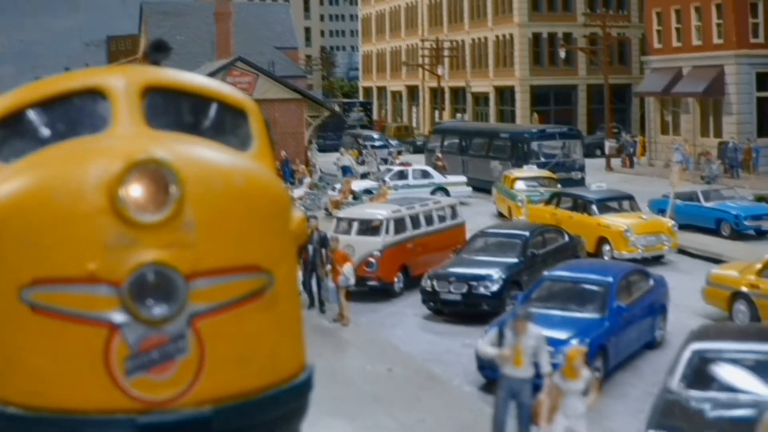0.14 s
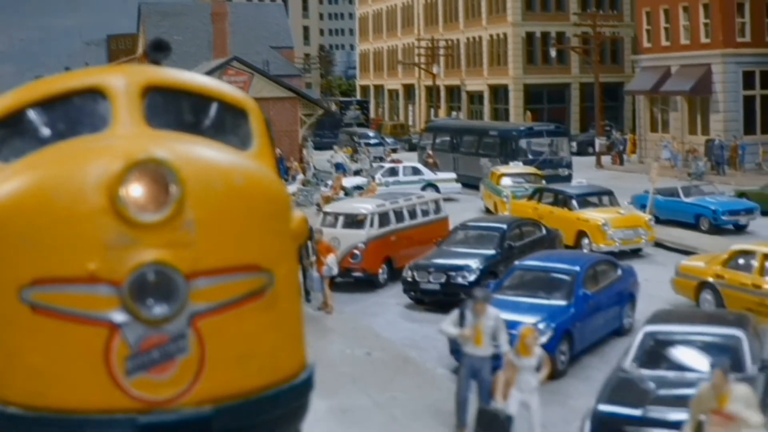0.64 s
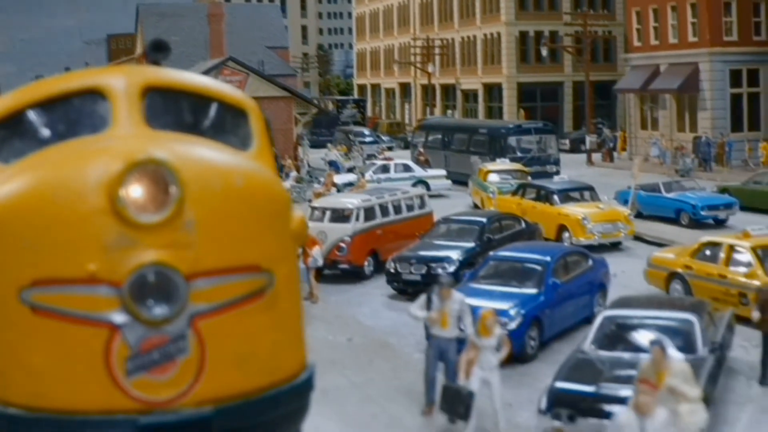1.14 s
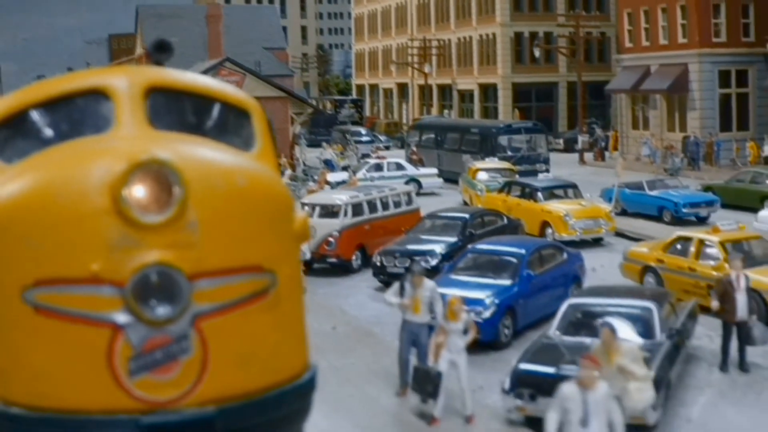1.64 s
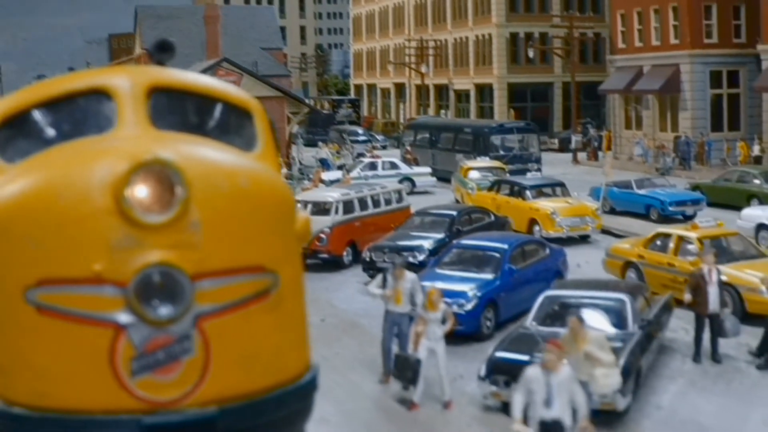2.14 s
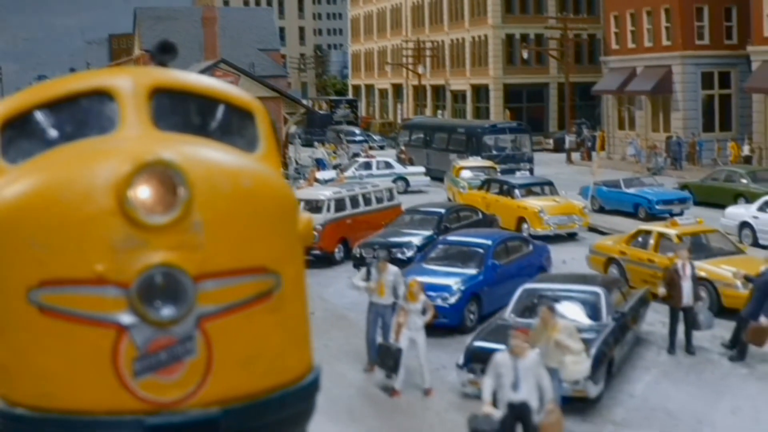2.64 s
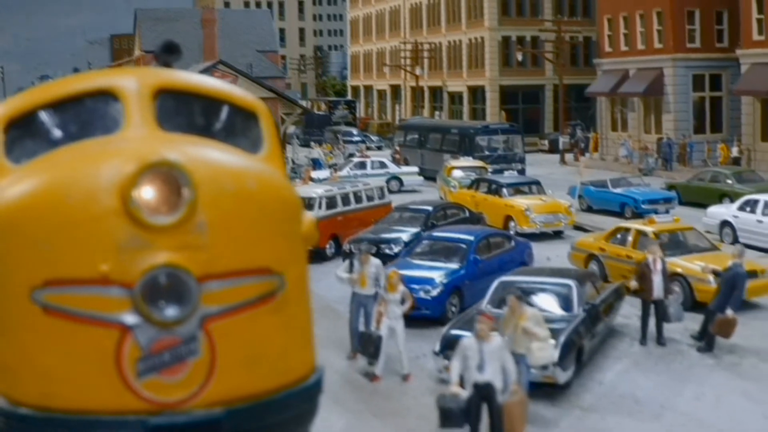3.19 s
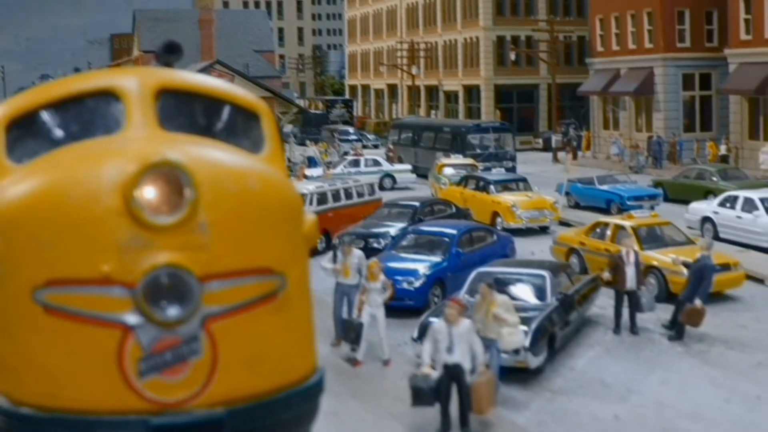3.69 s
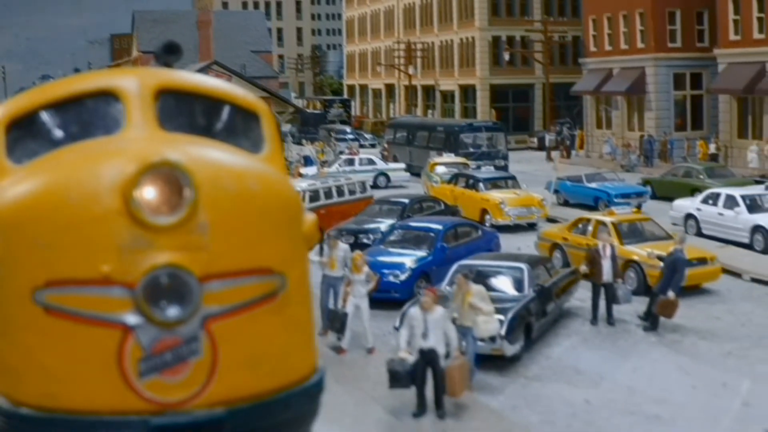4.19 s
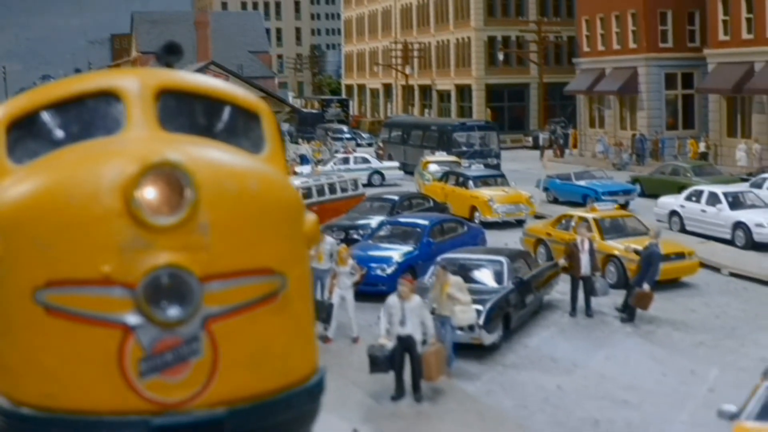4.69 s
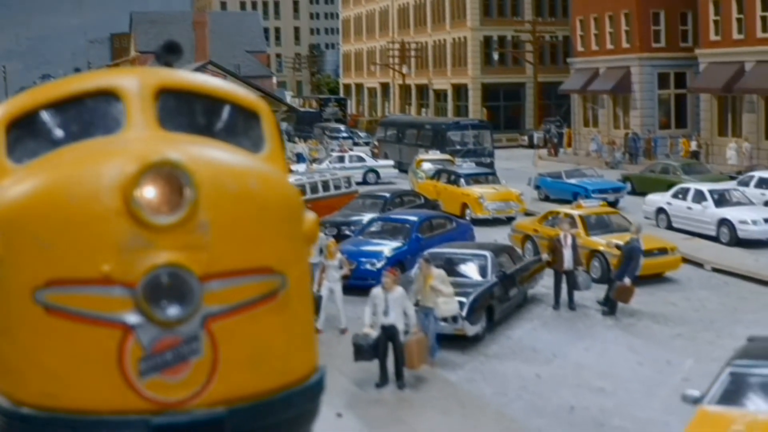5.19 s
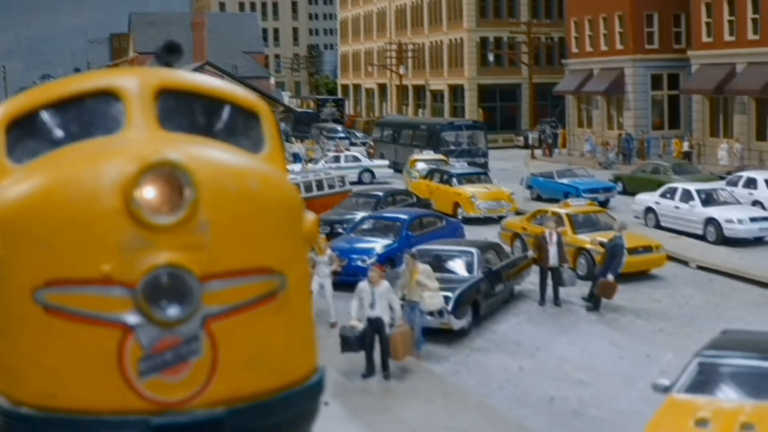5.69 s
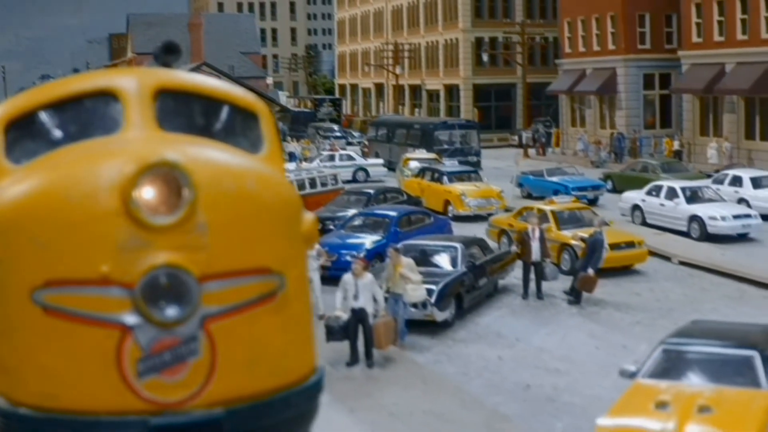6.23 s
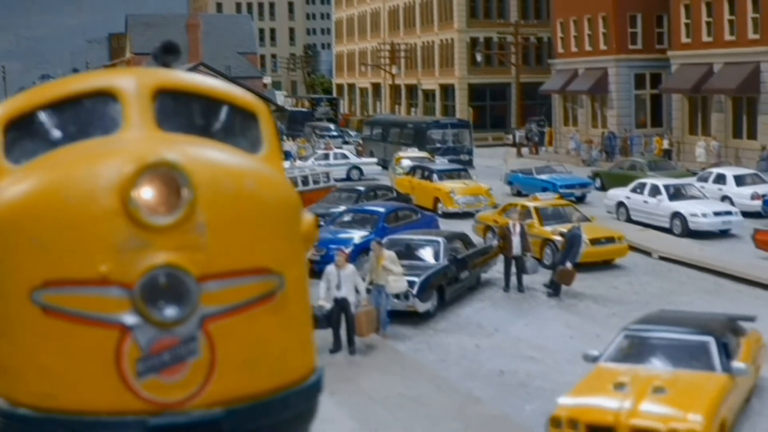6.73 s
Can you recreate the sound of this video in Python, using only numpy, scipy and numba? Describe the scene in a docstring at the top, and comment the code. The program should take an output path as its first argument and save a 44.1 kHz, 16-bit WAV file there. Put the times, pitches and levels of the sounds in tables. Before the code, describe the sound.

A small electric model train rolls at steady speed on a hollow baseboard, with the stereo microphone very near. From start to finish there is a clean, very deep hum around 57 hertz, a fainter one above it, and a dark, slightly fluttering rumble; the treble is only a faint hiss. The bass leans to the right. Wheels cross rail joints irregularly: a woody knock with a tiny ping at 0.3 seconds, a duller one at 1.2, light knocks and clicks near 3.0 and 3.2, then the hardest, a hollow thump with a bright dry tick, at 3.4, after which the rumble is briefly ducked. A blunt knock follows at 4.5, a faint click at 4.7, softer knocks at 6.2 and 6.5, and a heavy deep thump at 6.8. Several random soft taps fall between. No echo, and the train never stops.

```python
"""First come two clean hums in a low rumble: a small electric train at steady speed on a hollow baseboard.
The two-port microphone rides close to it; its ports hear the middle range in opposite phase.
Hums are sines, the rumble is shaped noise, and knocks and clicks over rail joints are mostly dying modes.
A peak limiter ducks everything after hard knocks, and a compressor evens the bass."""
import sys
import numpy as np
from scipy import signal
from scipy.fft import rfft, irfft, next_fast_len
from scipy.io import wavfile
from scipy.ndimage import uniform_filter1d, minimum_filter1d
from numba import njit

SR = 44100
rng = np.random.default_rng(int(sys.argv[2]) if len(sys.argv) > 2 else 0)


def volts(x):
    """Linear amplitude factor 10**(x/20) for a level x in dB, scalar or array-like."""
    e = np.asarray(x, float) / 20
    return 10 ** e


def to_wav(sig):
    """Store sig (one row per channel, or 1-D mono) as 16-bit WAV at the path in sys.argv[1].

    Samples outside -1..1 are clipped; the rate is SR.
    """
    pcm = np.clip(np.atleast_2d(sig), -1, 1) * 32767
    pcm = np.round(pcm).astype(np.int16)
    wavfile.write(sys.argv[1], SR, pcm.T)  # frames by channels


N = 301644  # samples


def read(table, hz):
    """Columns of a table over frequency, joined on a log axis."""
    f, *columns = np.transpose(table)
    return [np.interp(np.log(hz + 1), np.log(f + 1), column) for column in columns]


def smooth_chance(shape, spans):
    """Gaussian chance smoothed along each axis, rms 1."""
    z = rng.standard_normal(shape)
    for axis, span in enumerate(spans):
        z = uniform_filter1d(z, round(span), axis=axis, mode="wrap")
    return z / z.std()


def add(mix, start_s, sound):
    """Mixes a sound in at a time, cut off at the end of the mix."""
    part = mix[..., round(start_s * SR):][..., :sound.shape[-1]]
    part += sound[..., :part.shape[-1]]


def ring(modes, rise_s):
    """Dying sines with a soft start, one row a mode, as turning phasors; their sum peaks at 1."""
    t = np.arange(SR // 5) / SR
    hz, db, t60 = np.transpose(modes)[:3, :, None]
    fade = volts(db - 60 * t / t60)
    onset = (1 - np.exp(-t / rise_s)) ** 3
    tones = fade * np.exp(2j * np.pi * hz * t) * onset
    return tones / abs(tones.sum(0).imag).max()


def at_ports(modes, rise_s):
    """Modes that reach each port by their own path: the left gets its own level and lag for each."""
    tones = ring(modes, rise_s)
    left_db, left_lag = np.transpose(modes)[3:, :, None]
    left = (tones * volts(left_db) * np.exp(-1j * left_lag)).sum(0)
    return np.array([left, tones.sum(0)]).imag


# rolling noise at the right port, before the board lifts it: (f/Hz, level/dB per Hz)
ROLLING_NOISE = [(15, -49.5), (36, -51.5), (46, -42.5), (62, -41), (100, -51), (150, -52), (230, -56),
                 (420, -64), (650, -63), (800, -69), (1200, -87.5), (2200, -99.5), (3000, -104),
                 (4400, -110), (10500, -112), (12700, -121), (13100, -131), (16000, -140)]
# resonances of baseboard and housing that shape the rumble: (f/Hz, width/Hz, level/dB)
BOARD_RESONANCES = [(89.3, 25, 6.5), (183.5, 34.3, 8.5), (278, 10, 2.5), (316, 19, 3), (359.6, 15, 8),
                    (433.6, 28, 5), (603, 13, -3.5), (1060, 68, 3), (2830, 260, -1.5), (3720, 790, 0),
                    (6500, 3800, 3)]


def rumble(patchy_db, flicker_db, swell_db):
    """Rolling noise through the board, in two draws: one for both ports, one for the left alone."""
    hz = np.fft.rfftfreq(N, 1 / SR)
    level_db = read(ROLLING_NOISE, hz)[0]
    for f, width, db in BOARD_RESONANCES:
        level_db = level_db + db / (1 + (2 * (hz - f) / width) ** 2)
    white = rng.standard_normal((2, N)) * np.sqrt(SR / 2)  # 0 dB per Hz
    z = signal.stft(white, nperseg=512, noverlap=384)[2]
    # uneven wheels and track: patches in time and pitch, a flicker and a slow swell common to all bands
    patches = patchy_db * smooth_chance(z.shape[1:], (8, 20))
    flicker = flicker_db * smooth_chance(z.shape[2:], (10,))
    swell = swell_db * smooth_chance(z.shape[2:], (170,))
    z *= volts(patches + flicker + swell)
    uneven = signal.istft(z, nperseg=512, noverlap=384)[1][:, :N]
    return irfft(rfft(uneven) * volts(level_db), N)


# steady hums as they reach the right port: (f/Hz, rms level/dB)
STEADY_HUMS = [(57.09, -20.5), (136.52, -32.5)]


def hums():
    """Rotating parts at constant speed: clean sines."""
    t = np.arange(N) / SR
    out = np.zeros(N)
    for hz, rms_db in STEADY_HUMS:
        out += np.sqrt(2) * volts(rms_db) * np.sin(2 * np.pi * (hz * t + rng.random()))
    return out


# the microphone's left port against its right: (f/Hz, level/dB, likeness 0-1, lag/rad)
LEFT_PORT = [(35, -7, .65, .5), (58, -8, .98, .5), (110, -8.8, .94, .58), (150, -12, .68, .68),
             (200, -16, .72, .65), (250, -15.5, .35, 1.7), (300, -16, .65, 3.25), (400, -13, .95, 3.48),
             (600, -5.4, .99, 3.48), (1000, -1.7, .96, 3.55), (1900, 1.5, .55, 3.45), (2620, 1, .45, 2.3),
             (2740, .1, .5, -.5), (3800, .1, .55, -.6), (5400, -2, .17, 3.2), (7000, -1.5, .05, 3.1)]


def hear_at_ports(direct, shared, own):
    """The left port is a coloured, phase-turned copy of the right, partly replaced by its own rumble."""
    level_db, like, lag = read(LEFT_PORT, np.fft.rfftfreq(N, 1 / SR))
    # the two rumbles are mixed at constant power
    heard = rfft(direct) + like * rfft(shared) + np.sqrt(1 - like ** 2) * rfft(own)
    left = irfft(heard * volts(level_db) * np.exp(-1j * lag), N)
    return np.array([left, direct + shared])


# modes of the wheel's tick: (f/Hz, relative level/dB, t60/s, left port level/dB, left lag/rad)
TICK_MODES = [(1340, -4, 0.0098, 4, 4.5), (1780, 4, 0.011, -3.5, 3.5), (2220, -6, 0.0063, -3, -0.5),
              (2620, -2, 0.015, 2, 4), (3160, -2, 0.0084, 6, -0.5), (3610, 2, .009, -1.5, 0.5),
              (4520, -2, 0.01, -11, 0.5), (5560, 6, 0.0083, -10, -5), (6440, -10.5, 0.0099, 3, 2.5),
              (7480, -5, 0.008, -16.5, 1)]
# modes of the rail's ping: (f/Hz, relative level/dB, t60/s, left port level/dB, left lag/rad)
PING_MODES = [(1700, 4, .012, .5, 3.3), (2730, -3, .024, .5, 1.6), (4700, -4, .007, -6, .3),
              (5300, 1, .009, -12, 1.5)]
# dry wheel clicks at the right port:
# (t/s, tick peak level/dB, level/dB of the snap's noise before its filter, ping peak level/dB)
WHEEL_CLICKS = [(0.337, -51.5, -53.5, -42.5), (2.979, -53, -45.5, -71), (3.233, -49, -75, -61),
                (3.3737, -25, -44.5, -48), (3.38, -52, -33.5, -63), (4.74, -52, -48, -68),
                (6.216, -48, -51, -48), (6.832, -48, -54, -55)]


def wheel_clicks():
    """Each click is a tick of wheel modes, a snap of band-passed noise and a ping of the rail."""
    out = np.zeros((2, N))
    tick, ping = at_ports(TICK_MODES, rise_s=0.00056), at_ports(PING_MODES, rise_s=0.00086)
    snap_rise_s, snap_fade_s, snap_left_db = 0.00018, 0.001, -8
    t = np.arange(SR // 100) / SR
    shape = (1 - np.exp(-t / snap_rise_s)) * np.exp(-t / snap_fade_s)
    band = signal.butter(3, [3600, 8550], "band", fs=SR, output="sos")
    for s, tick_db, snap_db, ping_db in WHEEL_CLICKS:
        snap = signal.sosfilt(band, rng.standard_normal((2, len(t))) * shape)
        add(out, s, snap * volts([[snap_db + snap_left_db], [snap_db]]))
        add(out, s, volts(tick_db) * tick + volts(ping_db) * ping)
    return out


# dull knocks of the car floor, a few cycles without ring: (t/s, f/Hz, peak level/dB, length/s)
FLOOR_KNOCKS = [(1.2345, 720, -16.5, .0075), (3.3725, 625, -10, .0085), (3.3735, 205, -6, .0115),
                (4.526, 318, -13, .016), (6.8275, 570, -12.5, .009)]


def floor_knocks():
    """Some blows also bump the car floor: a short sine swells and dies within a few cycles."""
    out = np.zeros(N)
    for s, hz, db, length_s in FLOOR_KNOCKS:
        t = np.arange(0, length_s, 1 / SR)
        swell = np.sin(np.pi * t / length_s) ** 2
        add(out, s, volts(db) * swell * np.sin(2 * np.pi * hz * t))
    return out


# wheels over rail joints, peaks at the right port:
# (t/s, thump level/dB, tap level/dB, ring level/dB, clack level/dB)
JOINT_KNOCKS = [(.3385, -20, -19.5, -29, -31), (1.2346, -23.5, -27.5, -36, -30.5),
                (2.9907, -21, -28, -36, -44), (3.2308, -26.5, -19, -37.5, -48.5),
                (3.3735, -9.5, -11.5, -18, -29), (4.5275, -22, -21, -32.5, -36.5),
                (6.217, -28, -28.5, -34, -32.5), (6.5182, -23.5, -26, -44, -39),
                (6.831, -5.5, -25, -26.5, -27)]
# middle level of a soft knock: (thump level/dB, tap level/dB, ring level/dB, clack level/dB)
SOFT_KNOCK = [-30.5, -22, -34.5, -45.5]


def all_knocks():
    """Knocks of the rail joints, and six soft ones where small unevenness of the track comes at random."""
    when, size = rng.random((6, 2)).T
    soft = np.array(SOFT_KNOCK) + 4 * (2 * size[:, None] - 1)  # up to 4 dB softer or harder
    return JOINT_KNOCKS + [(s, *levels) for s, levels in zip(when * N / SR, soft)]


# mode of the board's tap: (f/Hz, relative level/dB, t60/s)
TAP_MODES = [(309, 0, 0.025)]
# mode of the car body's ring: (f/Hz, relative level/dB, t60/s)
BODY_MODES = [(613, 0, 0.066)]


def taps_and_body(knocks):
    """Each blow strikes board and car body in its own proportion, in opposite directions."""
    out = np.zeros(N)
    tap = ring(TAP_MODES, rise_s=0.0032).sum(0).imag
    body = ring(BODY_MODES, rise_s=0.0072).sum(0).imag
    for s, _, tap_db, ring_db, _ in knocks:
        add(out, s, volts(ring_db) * body - volts(tap_db) * tap)
    return out


# modes of the board's thump: (f/Hz, relative level/dB, t60/s, left port level/dB, left lag/rad)
THUMP_MODES = [(124.6, 4, 0.1, 4, 1.3), (185.4, 14, 0.062, -13, 3.6), (222, -6.5, 0.019, -1, 4.1)]
# mode of the wheel frame's clack: (f/Hz, relative level/dB, t60/s, left port level/dB, left lag/rad)
CLACK_MODES = [(1020, 0, .028, -2.5, 2.8)]


def thumps_and_clacks(knocks):
    """Each blow thumps the board and clacks the wheel frame, with its own path to each port."""
    out = np.zeros((2, N))
    thump, clack = at_ports(THUMP_MODES, rise_s=0.0028), at_ports(CLACK_MODES, rise_s=0.0018)
    for s, thump_db, _, _, clack_db in knocks:
        add(out, s, volts(thump_db) * thump + volts(clack_db) * clack)
    return out


def scene():
    """Rumble, hums, taps and floor knocks share one path to the ports; thumps and clicks have their own."""
    shared, own = rumble(patchy_db=0.65, flicker_db=0.65, swell_db=0.3)
    knocks = all_knocks()
    direct = hums() + taps_and_body(knocks) + floor_knocks()
    return hear_at_ports(direct, shared, own) + wheel_clicks() + thumps_and_clacks(knocks)


@njit
def duck(over_db, quick, slow, charge):
    """A quick stage catches each peak and charges a slow stage that lingers."""
    out, quick_db, slow_db = np.zeros(len(over_db)), 0., 0.
    for i in range(len(over_db)):
        quick_db = max(over_db[i] - slow_db, quick_db * quick)
        slow_db = slow_db * slow + charge * quick_db
        out[i] = quick_db + slow_db
    return out


def limit(x, ceiling_db, quick_s, slow_s, charge_per_s, window):
    """Peak limiter on the louder port, looking half a window (in samples) ahead."""
    peak_db = 20 * np.log10(abs(x).max(0) + 1e-9)
    over_db = -minimum_filter1d(ceiling_db - peak_db, size=window)
    quick, slow = np.exp(-1 / (quick_s * SR)), np.exp(-1 / (slow_s * SR))
    cut_db = duck(over_db, quick, slow, charge_per_s / SR)
    return x / volts(uniform_filter1d(cut_db, size=window))


def even_bass(x, top_hz, knee_db, share, span_s):
    """Bass compressor: swells of the right port's low band above the knee turn both low bands down."""
    low = signal.sosfiltfilt(signal.butter(2, top_hz, fs=SR, output="sos"), x)
    envelope = abs(signal.hilbert(low[1], next_fast_len(N))[:N])
    swell = uniform_filter1d(envelope, round(span_s * SR))
    over_db = np.clip(20 * np.log10(swell + 1e-9) - knee_db, 0, 4)
    return x - low * (1 - 1 / volts(share * over_db))


def low_pass(x):
    """Removes everything above the highest recorded frequency."""
    return signal.sosfilt(signal.butter(12, 15670, fs=SR, output="sos"), x)


def record(dry):
    """The limiter ducks both ports together, then the compressor evens the bass."""
    limited = limit(dry, ceiling_db=-9, quick_s=0.045, slow_s=0.45, charge_per_s=8., window=45)
    mix = even_bass(limited, top_hz=313, knee_db=-16.0, share=0.83, span_s=0.02)
    return low_pass(mix)


dry = scene()
out = record(dry)
to_wav(out)
```